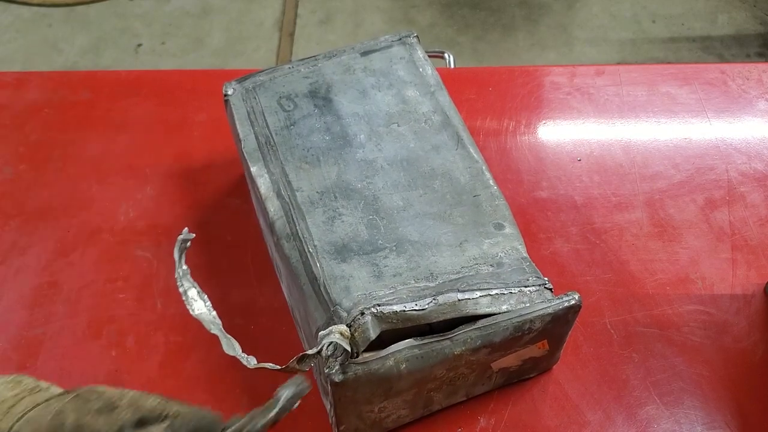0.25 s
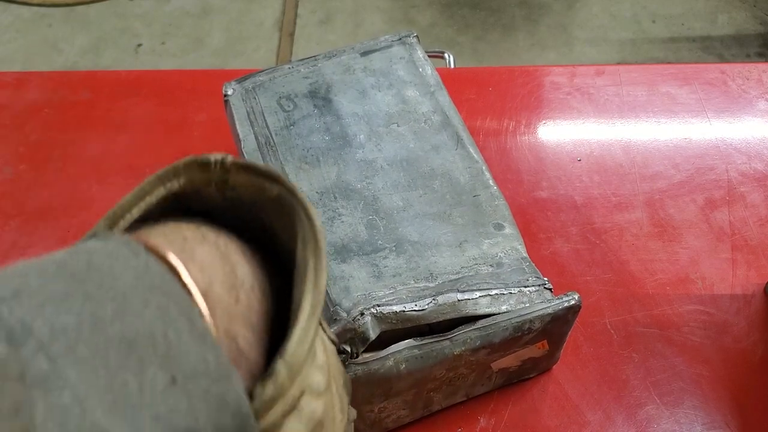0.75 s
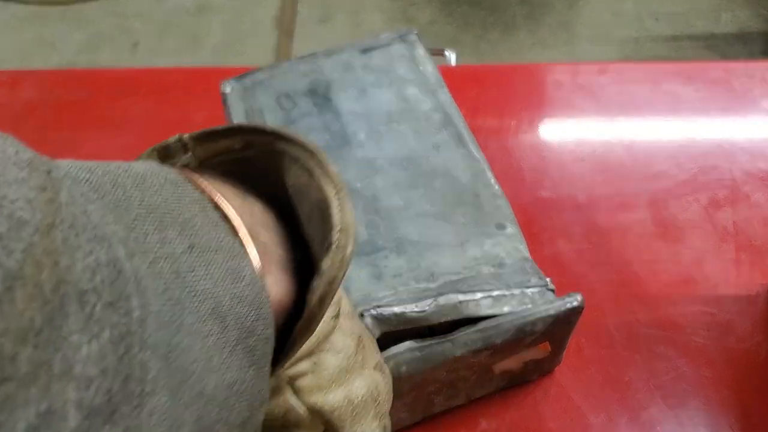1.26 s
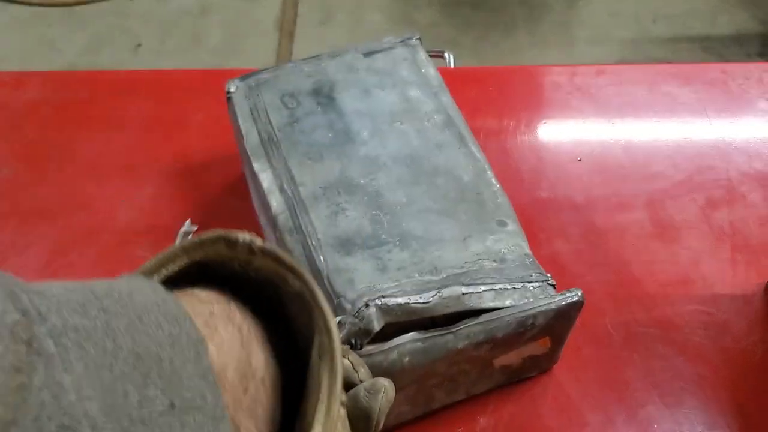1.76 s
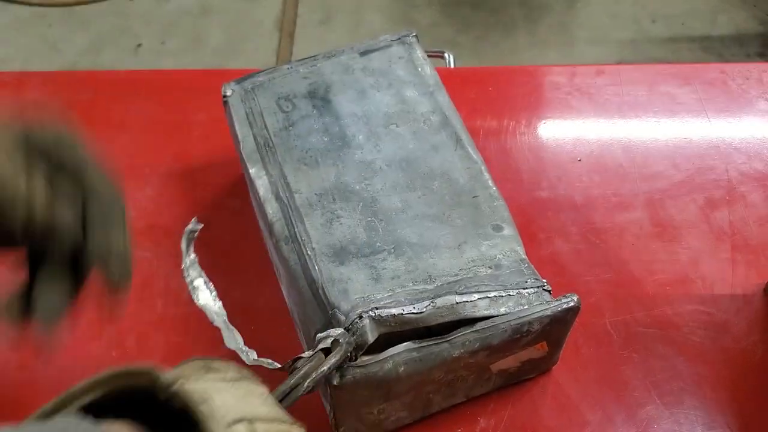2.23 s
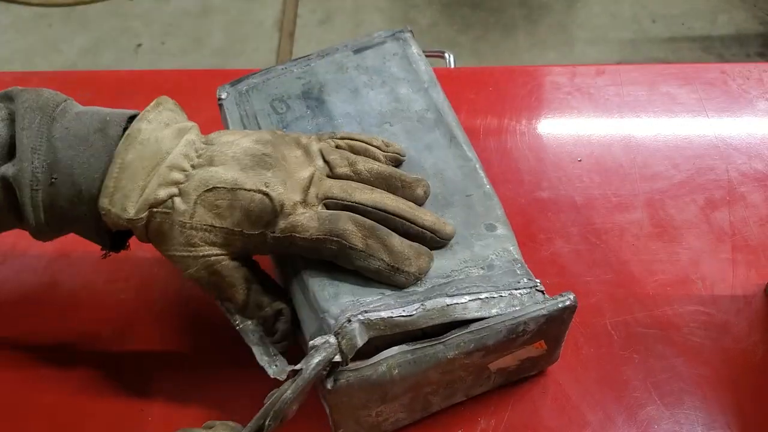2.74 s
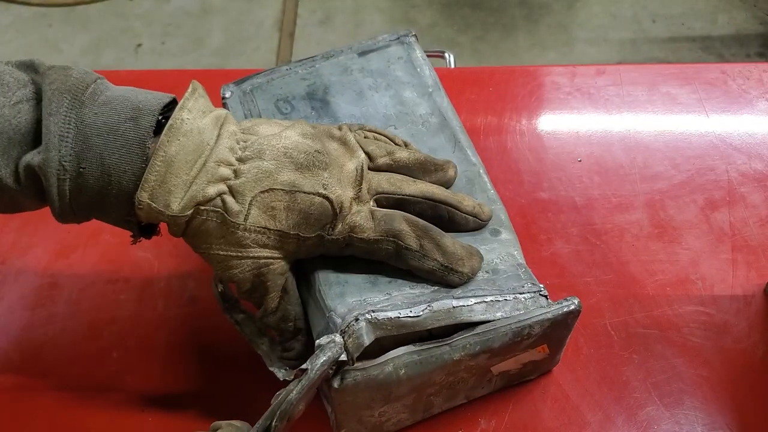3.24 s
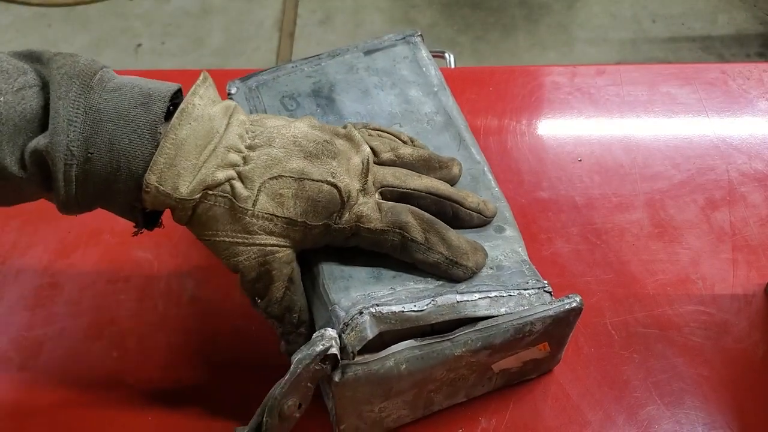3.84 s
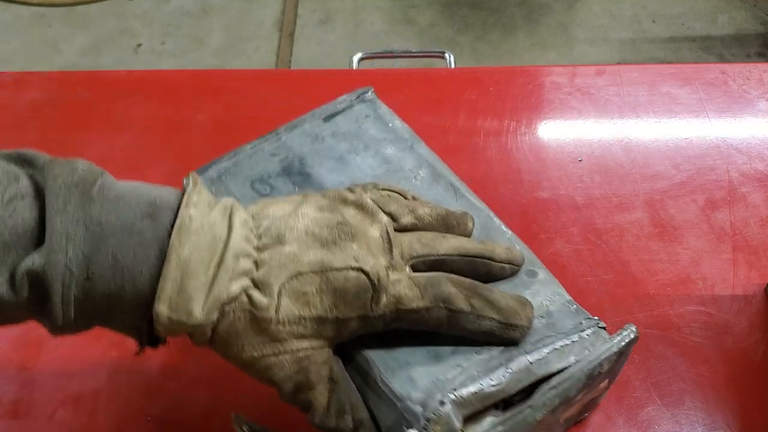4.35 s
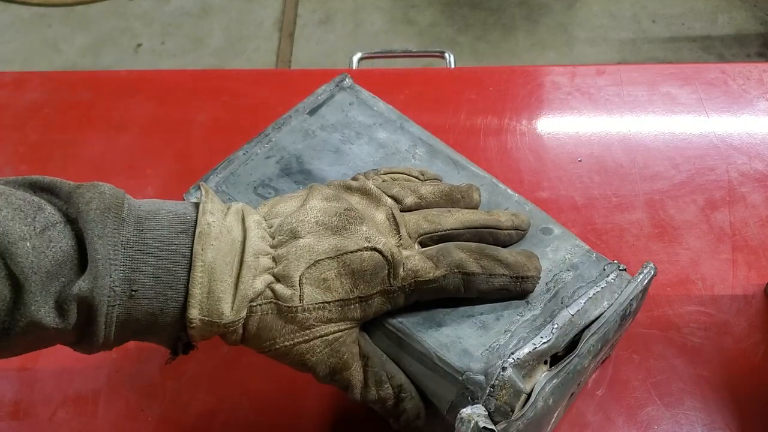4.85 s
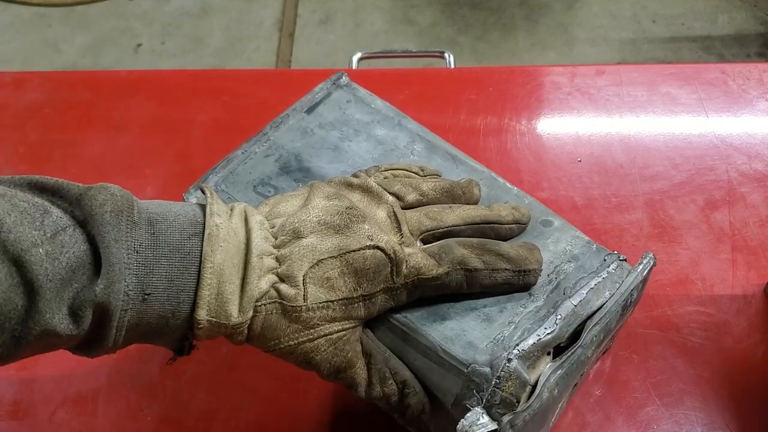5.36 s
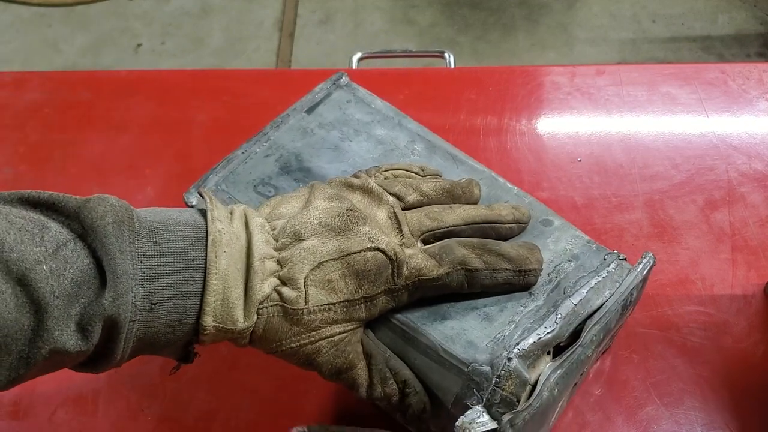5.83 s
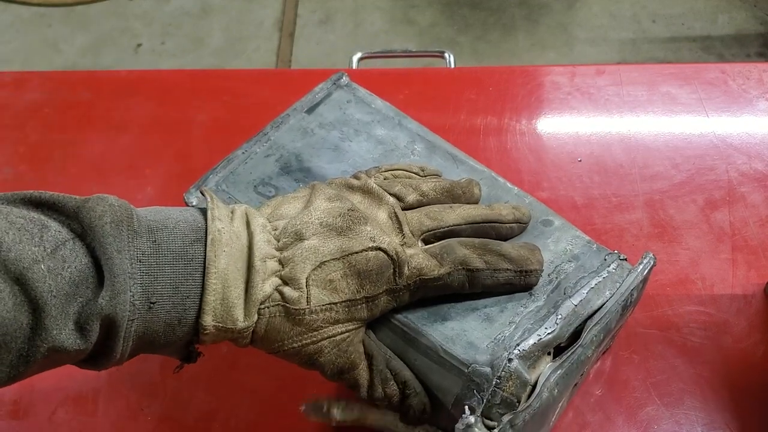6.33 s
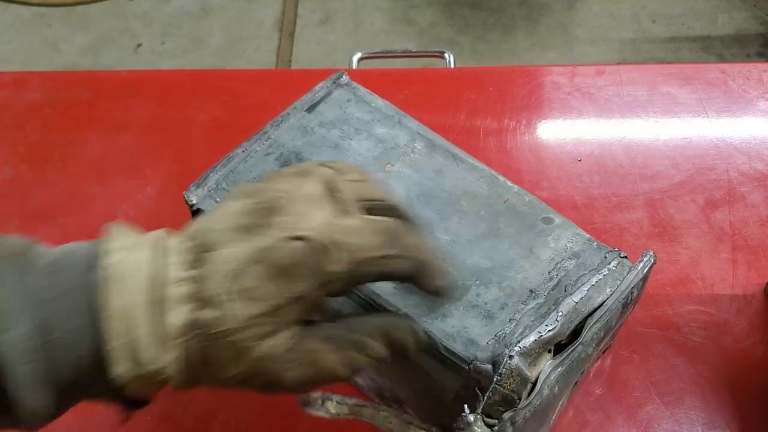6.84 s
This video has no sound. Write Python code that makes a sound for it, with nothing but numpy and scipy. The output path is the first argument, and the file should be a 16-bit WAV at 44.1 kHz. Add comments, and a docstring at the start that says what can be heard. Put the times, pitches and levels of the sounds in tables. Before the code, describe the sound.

Close hollow knocks, scuffs and light metallic clicks of a tin being shifted on a workbench over a faint workshop hum.

```python
"""Sheet-metal tin on a steel workbench

A gloved hand pushes and turns a tin on a hollow bench, close by, over the hum of a small workshop.
Impacts excite the damped modes of tin and bench top; pliers and a loose strip of seam click.
Sliding friction makes glove and sleeve rustle, the rim scuff and the pressed seam squeak faintly."""
import sys
import numpy as np
from scipy import signal
from scipy.fft import rfft, irfft, next_fast_len
from scipy.io import wavfile
from scipy.ndimage import uniform_filter1d

SR = 44100
rng = np.random.default_rng(int(sys.argv[2]) if len(sys.argv) > 2 else 0)


def log_audio(samples):
    """Write samples as a 16-bit WAV file to the path given in sys.argv[1]."""
    # one column per channel
    frames = np.atleast_2d(samples).T
    # limit to full scale, then quantise
    limited = np.clip(frames, -1, 1)
    pcm = np.round(limited * 32767).astype(np.int16)
    wavfile.write(sys.argv[1], SR, pcm)


N = 312669

# Modes of the tin on the bench. Each row: frequency in Hz, level in dB against the blow, t60 in seconds.
TIN_MODES = [(68, -15, .35), (97, -11, .3), (128, -12, .3), (161, -9, .4), (264, -13, .35), (313, -19, .4),
             (398, -13, .25), (463, -10, .25), (535, -10, .25), (612, -11, .22), (793, -18, .22),
             (978, -14, .22), (1303, -18, .2), (1455, -17, .2), (2100, -16, .2), (2810, -16, .25),
             (3160, -16, .22), (3870, -17, .2), (4390, -16, .18), (5010, -16, .2), (5479, -12, .22),
             (6590, -15, .22), (9854, -13, .16), (11845, -9, .25), (11885, -14, .32), (13610, -13, .18),
             (14250, -10, .2)]
# Spectra of the bench's thud and of friction's high fizz and lower rasp.
# Each row: frequency in Hz, relative level in dB.
THUD_SPECTRUM = [(25, -42), (55, -2.5), (100, 1.5), (190, 0), (320, -4), (450, -4), (600, -2.5), (780, -11),
                 (1200, -14.5), (2500, -24.5), (8000, -68)]
FIZZ_SPECTRUM = [(1000, -32), (5000, -10.5), (7000, 0.5), (9500, -6), (11400, 3), (12600, -2), (13800, 1),
                 (15500, -5.5)]
RASP_SPECTRUM = [(200, -8), (700, 0), (2000, 3), (4000, 2.5), (6300, 1.5), (10000, -30), (16000, -20)]
# Likeness of the sound at the two ears. Each row: frequency in Hz, correlation from -1 to 1.
COHERENCE = [(100, 0.97), (220, 0.96), (500, 0.48), (1000, 0), (2500, 0.0017), (12000, 0)]


def gain_of(db):
    """Amplitude ratio of a level in decibels."""
    return 10 ** (np.asarray(db) / 20)


def unit_rms(x):
    """Normalises a signal to unit power."""
    return x / np.sqrt(np.mean(x ** 2) + 1e-20)


def read(points, hz):
    """Interpolates a table on a logarithmic frequency axis."""
    f, value = np.transpose(points)
    return np.interp(np.log(hz + 1), np.log(f + 1), value)


def add(mix, start, sound):
    """Superposes a stereo sound on the mix from start seconds."""
    part = mix[:, round(start * SR):][:, :sound.shape[1]]
    part += sound[:, :part.shape[1]]


def noise(colour, size):
    """Partly coherent stereo noise with the dB spectrum colour(hz): long waves reach both ears alike."""
    length = next_fast_len(size)
    hz = np.fft.rfftfreq(length, 1 / SR)
    a, b = rfft(rng.standard_normal((2, length)))
    coherence = read(COHERENCE, hz)
    mid, side = a * np.sqrt(1 + coherence), b * np.sqrt(1 - coherence)
    spectrum = np.array([mid + side, mid - side]) * gain_of(colour(hz))
    return unit_rms(irfft(spectrum, length)[:, :size])


def shaped(points, size):
    """Stereo noise with a tabulated spectral envelope."""
    return noise(lambda hz: read(points, hz), size)


def wander(size, span):
    """Low-pass random fluctuation: white noise averaged over span samples."""
    return unit_rms(uniform_filter1d(rng.standard_normal(size), span))


def grain(size, depth_db, span):
    """Random amplitude modulation from uneven grip."""
    return unit_rms(gain_of(depth_db * wander(size, span)))


def damped(x, decays, stretch, rise_cycles=.3):
    """Frequency-dependent damping: each band builds up, then decays in its t60 times stretch."""
    size = x.shape[1]
    t, hz, spectrum = np.arange(size) / SR, np.fft.rfftfreq(size, 1 / SR), rfft(x)
    centres, out = np.transpose(decays)[0], 0
    for (centre, t60), pick in zip(decays, np.eye(len(decays))):
        band = irfft(spectrum * read(np.transpose([centres, pick]), hz), size)
        onset = 1 - np.exp(-t * centre / rise_cycles)
        out = out + band * onset * gain_of(-60 * t / (t60 * stretch))
    return out


def hum(noise_db=-52, waver_hz=3):
    """Background noise of the workshop: a dull continuous spectrum plus frequency-modulated tones."""
    # Noise floor. Each row: frequency in Hz, relative level in dB.
    floor_spectrum = [(25, -21), (55, -10.5), (120, 1.5), (200, -7.5), (290, -13), (420, -8.5), (600, -10),
                      (720, -14.5), (1250, -21), (2000, -17.5), (4000, -26), (6600, -25.5), (9000, -37),
                      (11500, -27), (15500, -38)]
    # Hum tones. Each row: frequency in Hz, level in dB.
    hum_tones = [(64, -58.5), (135, -61.5), (240, -71.5), (360, -72), (490, -78.5), (605, -76.5)]
    out = gain_of(noise_db) * shaped(floor_spectrum, N)
    for hz, db in hum_tones:
        pitch = hz + waver_hz * wander(N, span=3000)
        out += np.sqrt(2) * gain_of(db) * np.sin(2 * np.pi * np.cumsum(pitch) / SR)
    return out


def arch(length):
    """Half a sine cycle lasting length seconds."""
    return np.sin(np.pi * np.linspace(0, 1, round(length * SR), endpoint=False))


def stroke_levels(easy_db=-55, rasp_db=-57, rasp_growth=0.5, settle_t60=0.22):
    """Friction noise grows with speed, the fizz faster than the rasp, so brisk strokes are brighter."""
    # Hand strokes. Each row: start in seconds, length in seconds, relative level at full speed in dB.
    hand_strokes = [(0.0, 0.038, -51), (.11, 0.14, -58.5), (1.12, .06, -63), (1.207, 0.043, -55.5),
                    (1.66, 0.18, -65), (2.097, 0.21, -62.5), (2.378, 0.052, -54), (2.673, 0.13, -64),
                    (2.888, 0.2, -50.5), (3.407, 0.14, -53.5), (3.507, 0.097, -49), (3.888, 0.11, -57),
                    (4.037, 0.2, -55), (4.285, 0.18, -53.5), (4.455, .14, -52), (4.613, 0.29, -48.5),
                    (5.028, .18, -63.5), (5.27, 0.035, -51.5), (5.33, 0.4, -56), (5.72, 0.15, -50.5),
                    (5.857, 0.15, -55), (6.313, .19, -56.5), (6.502, 0.23, -56.5), (6.705, .37, -51),
                    (6.83, 0.059, -39.5)]
    power = np.zeros((2, N))
    for start, length, db in hand_strokes:
        fizz = gain_of(db) * arch(length) ** 0.32  # the low exponent flattens the top
        rasp = gain_of(rasp_db) * (fizz / gain_of(easy_db)) ** rasp_growth
        add(power, start, np.array([fizz, rasp]) ** 2)
    pole = np.exp(-2 * np.log(1000) / (settle_t60 * SR))
    return np.sqrt(signal.lfilter([1 - pole], [1, -pole], power))


def rubbing(fizz_db=0.5, rasp_db=-1, left_db=1):
    """Sliding friction of leather and cloth gives grainy noise that dies away when the hand rests."""
    fizz_level, rasp_level = stroke_levels()
    fizz = gain_of(fizz_db) * fizz_level * shaped(FIZZ_SPECTRUM, N)
    rasp = gain_of(rasp_db) * rasp_level * shaped(RASP_SPECTRUM, N)
    return (fizz + rasp) * grain(N, depth_db=2, span=120) * gain_of([[left_db], [-left_db]])


def bench_rumble(level_db=1.5):
    """Forced vibration: the sliding tin drives the bench top during each stroke."""
    _, rasp_level = stroke_levels()
    return gain_of(level_db) * rasp_level * shaped(THUD_SPECTRUM, N)


def clicks(skirt_db=30, left_db=1):
    """Small hard contacts of pliers and seam excite heavily damped resonances, each a band of noise."""
    # Each row: start in seconds, level in dB, centre in Hz, width in octaves, t60 in seconds.
    contacts = [(0.735, -39, 217, 0.19, 0.15), (0.832, -44, 412, 0.18, 0.059),
                (1.013, -46.5, 4500, 2.5, 0.014), (2.347, -35, 11000, 4.5, 0.0089),
                (2.563, -35.5, 292, 0.31, 0.18), (3.6149, -20.5, 12300, 0.52, 0.021),
                (3.808, -34.5, 4700, 0.9, 0.023), (3.851, -37, 4700, 0.8, 0.036),
                (3.867, -33, 4470, 0.8, 0.021), (3.919, -39, 9000, 1.4, .02),
                (4.842, -32.5, 1680, 1.1, 0.025), (5.033, -50, 10000, 1, 0.056),
                (5.091, -46.5, 1080, 0.26, 0.069), (5.501, -38.5, 2520, 0.62, 0.043),
                (5.774, -43, 2300, 0.4, 0.055), (6.0646, -23.5, 2060, 0.17, 0.022),
                (6.0666, -31, 1490, 0.59, 0.048), (6.0802, -34, 3250, 3.5, 0.086),
                (6.181, -31.5, 2010, 0.39, 0.024), (6.426, -32, 4040, 1.1, 0.026),
                (6.427, -34.5, 750, 0.23, 0.1), (6.681, -43.5, 700, 0.74, 0.13),
                (6.729, -40, 680, 0.38, 0.14), (6.792, -40.5, 895, 0.52, 0.08)]
    out, t = np.zeros((2, N)), np.arange(2 ** 12) / SR
    for start, db, centre, width, t60 in contacts:
        def resonance(hz):
            detuning = np.log2((hz + 1) / centre) / width
            return -skirt_db / 2 * np.log10(1 + detuning ** 2)
        add(out, start, gain_of(db - 60 * t / t60) * noise(resonance, len(t)))
    return out * gain_of([[left_db], [-left_db]])


def mode_waves(t, rim_rise_s=0.0078, body_rise_s=.001):
    """Each mode is a damped complex sinusoid; the rim's modes, above 8 kHz, build up more slowly."""
    hz, _, t60 = np.transpose(TIN_MODES)
    rise = np.where(hz > 8000, rim_rise_s, body_rise_s)
    onset = np.minimum(t / rise[:, None], 1)
    return onset * np.exp(np.outer(2j * np.pi * hz - np.log(1000) / t60, t))


def tin_ring(waves, thud_db, crack_db, heavy_db=-23, spread_db=0.5):
    """Modal superposition: the thud of a blow drives the tin's low modes, its crack the high ones."""
    hz, db, _ = np.transpose(TIN_MODES)
    scatter, apart, phase = rng.standard_normal((3, len(hz)))
    drive_db = thud_db + np.clip(np.log2(hz / 700), 0, 1) * (crack_db - thud_db)
    # only a heavy blow wakes the stiff rim's top modes
    muted_db = 1.8 * np.clip(np.log2(hz / 5000), 0, 1) * min(thud_db - heavy_db, 0)
    level = gain_of(db + drive_db + muted_db + spread_db * scatter)
    # short waves reach the two ears out of step
    offset = apart * np.arccos(read(COHERENCE, hz)) / 2
    weights = level * np.exp(1j * (np.pi * phase + np.array([offset, -offset])))
    return np.sqrt(2) * (weights @ waves).real


def knocks(push_db=4, push_s=.001, snap_db=3.5, snap_s=.006, ripple_db=3.5, grip_db_per_s=200):
    """Impact excitation: a blow pushes the bench top once, then the modes of tin and bench ring down."""
    # Each row: start in seconds, relative levels of thud and crack in dB, factor on the ring time.
    blows = [(0.737, -50.5, -59, 0.66), (.833, -45.5, -75, 0.55), (1.565, -48.5, -65, 0.37),
             (1.741, -41, -60, 0.65), (1.779, -42.5, -54, 0.41), (1.938, -31.5, -42.5, 0.77),
             (1.951, -29, -57, 0.7), (2.014, -36.5, -63, 1), (2.561, -39.5, -70, 0.74),
             (2.586, -39, -54, 0.96), (3.121, -22, -28.5, 1.08), (3.134, -19, -26.5, 0.47),
             (3.2633, -27.5, -36.5, 0.95), (3.586, -42.5, -78, 1.65), (3.918, -43.5, -62, 0.89),
             (4.173, -26.5, -31.5, 0.94), (4.189, -29, -47, 0.99), (4.766, -30, -47, 0.66),
             (4.804, -32, -51, 0.57), (6.082, -36.5, -36.5, 0.52), (6.158, -42.5, -54, 0.91),
             (6.426, -36.5, -43, 0.63), (6.595, -44, -57, 0.65), (6.681, -43, -69, 1.1),
             (6.731, -41, -49, 0.84), (6.792, -39, -44, 0.5), (7.0683, -22, -22.5, 1.1),
             (7.0757, -39, -25.5, 0.91)]
    # Crack of the metal. Each row: frequency in Hz, relative level in dB.
    crack_spectrum = [(200, -4), (600, -10), (1300, -12.5), (2200, -4.5), (4000, -2.5), (6300, -0.5),
                      (10000, -8), (16000, -32)]
    # Damping of tin and bench together. Each row: frequency in Hz, t60 in seconds before that factor.
    panel_decay = [(60, 0.28), (200, 0.49), (550, 0.17), (1500, 0.24), (4000, 0.22), (12000, 0.065)]
    out, t = np.zeros((2, N)), np.arange(2 ** 14) / SR
    u = t / push_s
    push = -u * (2 - u) * np.exp(-u) * 2 * gain_of(push_db)
    snap, waves = gain_of(snap_db * np.exp(-t / snap_s)), mode_waves(t)
    # the same ragged peaks and valleys of the sheet colour every crack
    grid = np.linspace(0, SR / 2, 2 ** 9)
    ripple = ripple_db * rng.standard_normal(len(grid))
    for start, thud_db, crack_db, stretch in blows:
        thud = gain_of(thud_db) * shaped(THUD_SPECTRUM, len(t))
        sheet = noise(lambda hz: read(crack_spectrum, hz) + np.interp(hz, grid, ripple), len(t))
        crack = gain_of(crack_db - 1) * snap * sheet
        grip_loss_db = grip_db_per_s * max(1 / stretch - 1, 0) * t  # a tight grip shortens the ring
        modes = tin_ring(waves, thud_db, crack_db) * gain_of(-2.5 - grip_loss_db)
        add(out, start, gain_of(thud_db) * push + damped(thud + crack, panel_decay, stretch) + modes)
    return out


def rim_response(t):
    """Impulse response of the stiff rim: the tin's modes above 8 kHz, with unit energy."""
    hz, db, _ = np.transpose(TIN_MODES)
    ring = ((gain_of(db) * (hz > 8000)) @ mode_waves(t)).real
    return ring[None] / np.linalg.norm(ring)


def scuffs(ring_db=-10):
    """The rim skids on paint; friction noise drives its resonances, the more so the harder it rasps."""
    # Each row: start in seconds, fizz level in dB, rise and t60 in seconds,
    # rasp level against the fizz in dB, left minus right level of the fizz in dB.
    skids = [(1.934, -42.5, 0.013, 0.36, -1.5, -1), (2.020, -47.5, .008, 0.14, -10, -2),
             (2.565, -42.5, 0.026, 0.26, -0.5, 0), (3.121, -26.5, 0.011, 0.35, -7, 1.5),
             (3.262, -37, 0.0077, 0.095, -6, 0), (3.612, -28.5, 0.0041, 0.31, -17.5, -0.5),
             (4.178, -27.5, 0.024, 0.11, -12, 6.5), (4.214, -45, .010, 0.65, -5, 2),
             (4.767, -32, 0.0074, 0.13, -10.5, 2), (4.781, -52.5, 0.016, 0.38, -0.5, -3),
             (7.069, -14, 0.0011, 0.1, -19, 4)]
    out, t = np.zeros((2, N)), np.arange(2 ** 14) / SR
    rim = rim_response(t)
    for start, db, rise, t60, rasp_db, left_db in skids:
        slide = np.minimum(t / rise, 1) * gain_of(db - 60 * np.maximum(t - rise, 0) / t60)
        # the tin shades the shortest waves from one ear
        fizz = shaped(FIZZ_SPECTRUM, len(t)) * gain_of([[left_db / 2], [-left_db / 2]])
        rasp = gain_of(rasp_db) * shaped(RASP_SPECTRUM, len(t))
        add(out, start, slide * (fizz + rasp) * grain(len(t), depth_db=1.5, span=90))
        add(out, start, gain_of(rasp_db + ring_db) * signal.fftconvolve(slide * fizz, rim, axes=1))
    return out


def squeaks(waver=0.0056, flutter_db=5, fade_s=0.0073):
    """Friction-excited oscillation: the seam slips, its pitch rising and falling with the pressure."""
    # Each row: start and length in seconds, pitch at the ends in Hz, rise midway in Hz, level in dB.
    slips = [(5.392, 0.27, 8900, 580, -69), (5.64, .42, 8700, 1400, -72), (6.32, .15, 14000, 1590, -63)]
    out = np.zeros((2, N))
    for start, length, hz, lift_hz, db in slips:
        pressure = arch(length)
        t = np.arange(len(pressure)) / SR
        pitch = (hz + lift_hz * pressure) * (1 + waver * wander(len(t), span=100))
        fade = np.minimum(np.minimum(t, t[::-1]) / fade_s, 1)
        level = gain_of(db) * fade * grain(len(t), flutter_db, span=500)
        add(out, start, np.sqrt(2) * level * np.sin(2 * np.pi * np.cumsum(pitch) / SR)[None])
    return out


def reverberation(x):
    """Diffuse field of the small room: convolution with a decaying noise tail."""
    # Each row: frequency in Hz, t60 in seconds before scaling by stretch.
    room_decay = [(100, 0.92), (500, 0.75), (2000, 0.55), (6000, 0.69), (14000, 0.19)]
    white = noise(np.zeros_like, 2 ** 15)
    tail = damped(white, room_decay, stretch=0.81, rise_cycles=10)
    return signal.fftconvolve(x, tail / np.linalg.norm(tail[0]), axes=1)[:, :N]


def scene(wet_db=-12):
    """Superposition of the contact sounds, their reverberation, the dry rubbing and the hum."""
    contacts = knocks() + scuffs() + clicks() + bench_rumble() + squeaks()
    echo = gain_of(wet_db) * reverberation(contacts.mean(0, keepdims=True))
    return contacts + echo + rubbing() + hum()


def record(dry):
    """Linear filtering: the microphone port cuts a notch near 8 kHz and a low-pass limits the band."""
    # Response of the port. Each row: frequency in Hz, gain in dB.
    port_response = [(6800, 1.5), (7300, -9.5), (7800, -12), (8500, -8.5), (9400, -1), (10200, 1.5)]
    hz = np.linspace(0, SR / 2, 513)
    port = signal.firwin2(511, hz, gain_of(read(port_response, hz)), fs=SR)
    band_limit = signal.firwin(401, cutoff=15850, window=("kaiser", 9), fs=SR)
    return signal.oaconvolve(dry, np.convolve(port, band_limit)[None], "same", axes=1)


dry = scene()
out = record(dry)
log_audio(out)
```